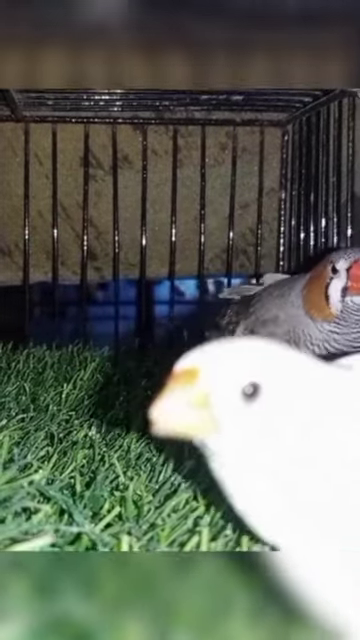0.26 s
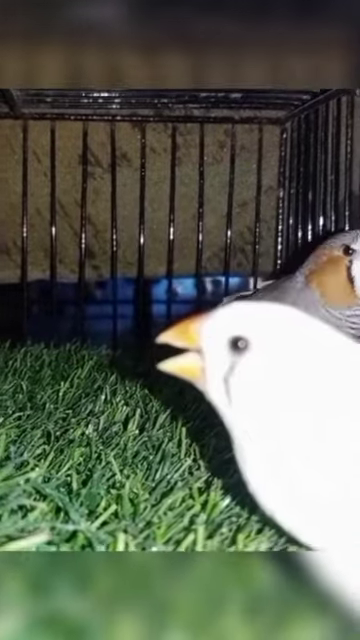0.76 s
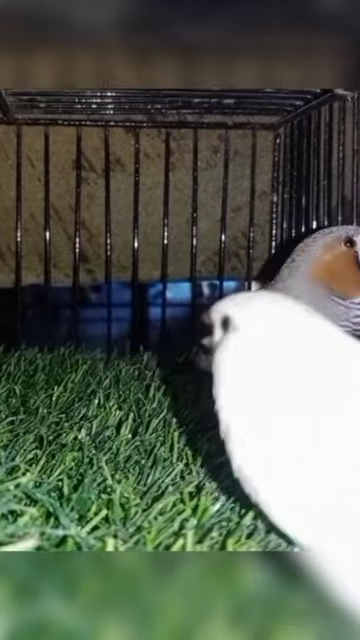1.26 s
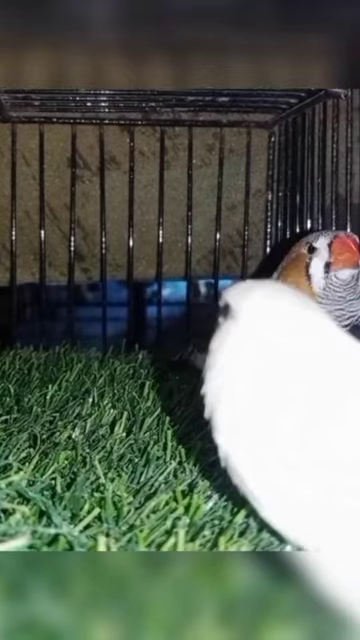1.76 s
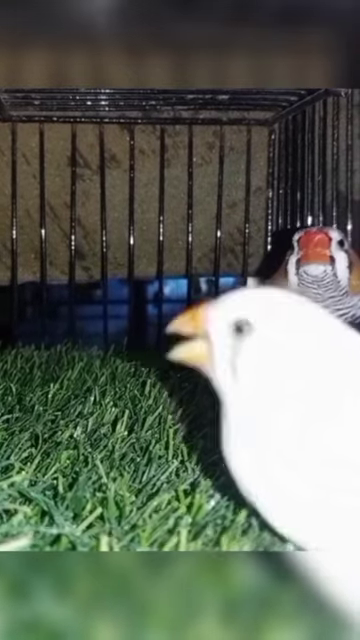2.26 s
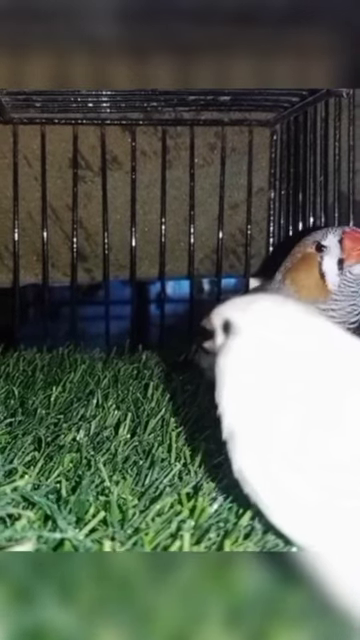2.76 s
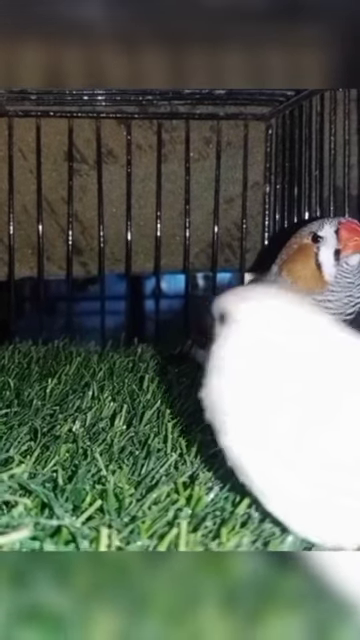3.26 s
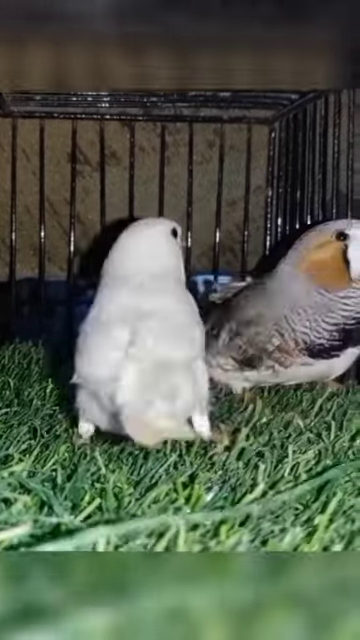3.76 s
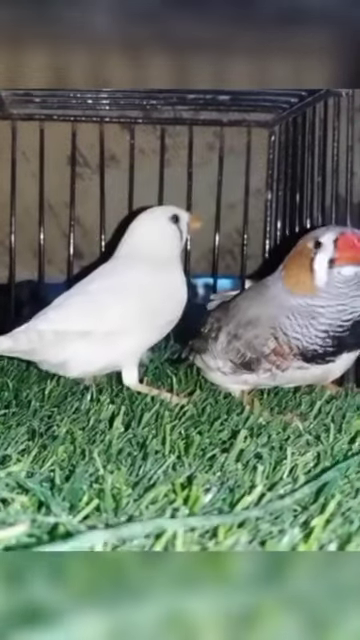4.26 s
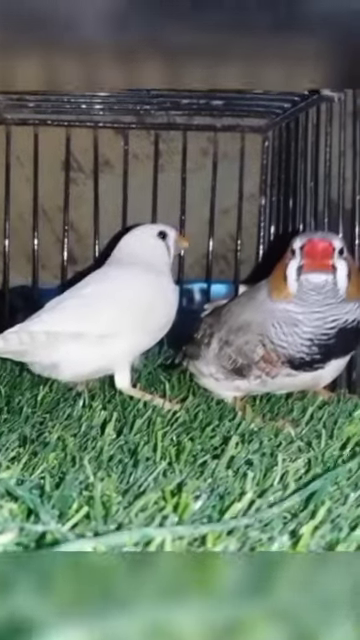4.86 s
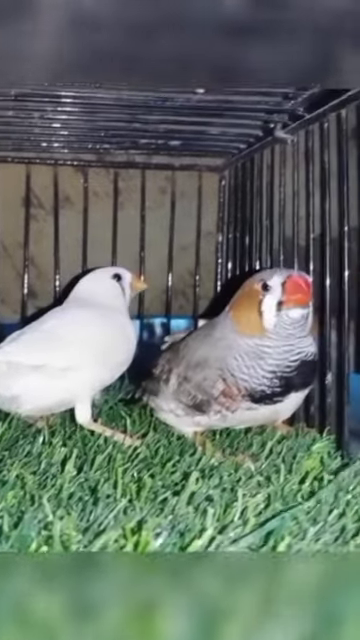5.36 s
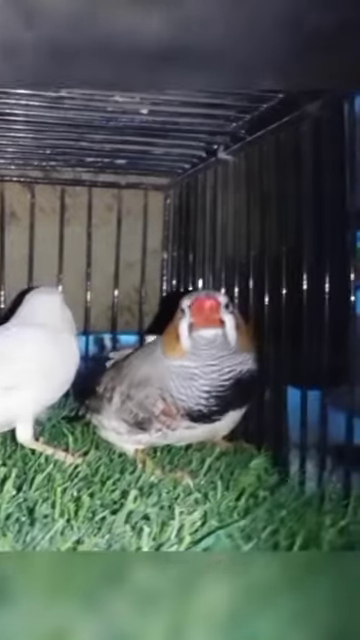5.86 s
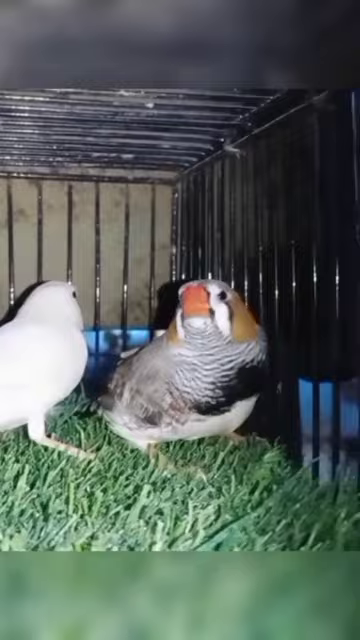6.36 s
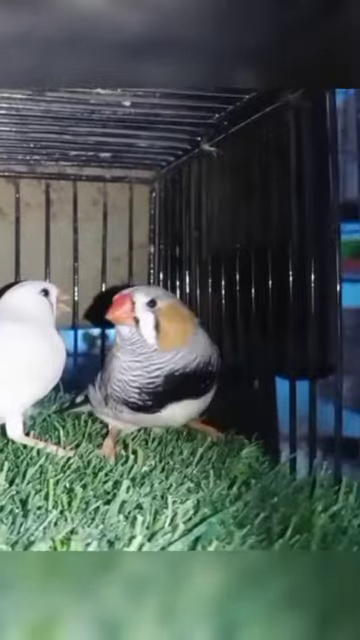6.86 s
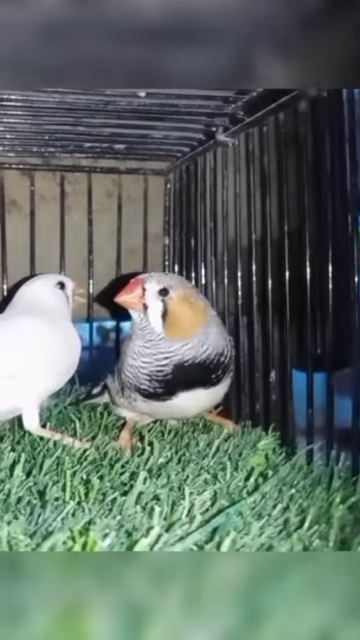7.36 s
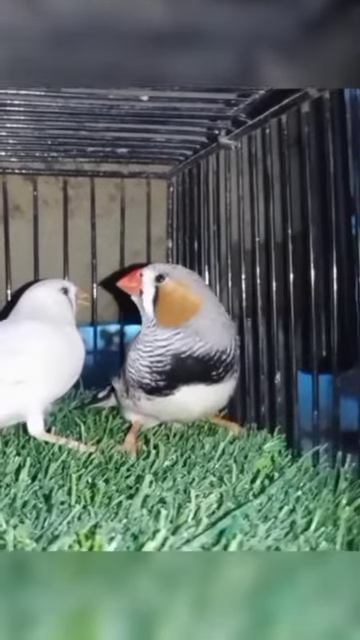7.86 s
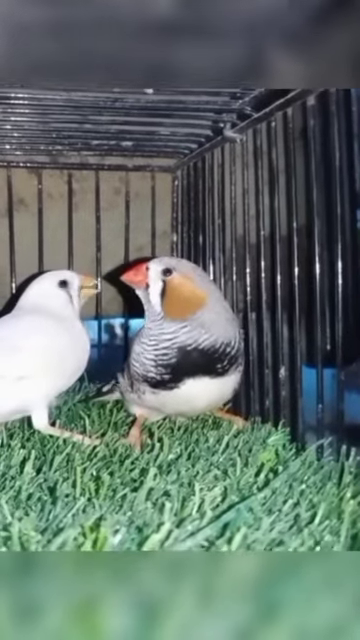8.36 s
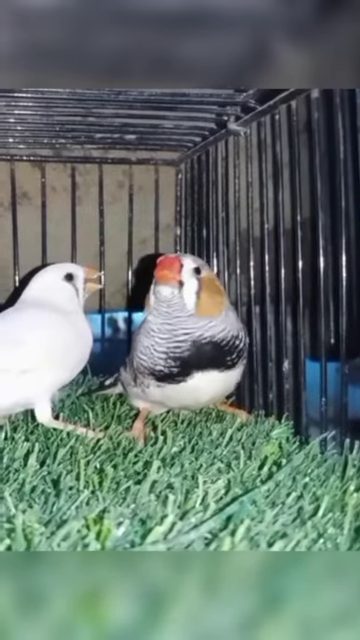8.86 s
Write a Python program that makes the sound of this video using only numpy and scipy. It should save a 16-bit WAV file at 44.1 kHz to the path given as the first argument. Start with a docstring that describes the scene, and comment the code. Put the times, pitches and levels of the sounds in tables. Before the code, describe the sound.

Small finches chirp almost continuously at close range, high sliding notes, peeps and a short fast trill, with faint low rumble behind.

```python
"""A phone close to small caged finches in a small room, for nine seconds: whistles, slurs and buzzes.
A far rumble, hum and hiss are there from the start; the rumble's ground-echo comb drifts mostly down as it fades.
Sliding notes come first, then scooped peeps from 1 s, rustles from 3 s, a rasping row at 4 s, a fast trill
at 5 s, one dull tap near 7 s and peeps at the end. Noise tails act as walls and wash out every slur.
The phone bends loud notes a little; its crude rate conversion shadows tones 3.9 kHz above and below."""
import sys
import numpy as np
from scipy import signal
from scipy.fft import rfft, irfft, next_fast_len
from scipy.io import wavfile
from scipy.ndimage import uniform_filter1d

SR = 44100
rng = np.random.default_rng(int(sys.argv[2]) if len(sys.argv) > 2 else 0)


def persist_wave(psi):
    """Save psi, clipped to +-1, as 16-bit WAV."""
    counts = np.round(np.clip(psi, -1, 1) * 32767).astype(np.int16)
    wavfile.write(sys.argv[1], SR, np.atleast_2d(counts).T)


N = 402191

# Far rumble and the delay of its reflection off the ground: start_s, level_db, echo_lag_ms
RUMBLE_PATH = [(0, -56, 3.6), (.6, -52, 3.67), (2.3, -52, 3.44), (2.999, -50.5, 3.73), (3.8, -52, 5.34),
               (4.5, -56.5, 5.2), (6.502, -58, 5.65), (9.12, -66, 6)]
# Spectrum shapes of the rumble, room hum, hiss and rustles: frequency_hz, relative_density_db
RUMBLE_COLOUR = [(30, -45.5), (130, -6), (220, -1), (350, -7), (900, -8), (1500, -18.5), (2400, -33.5)]
HUM_COLOUR = [(30, -45), (70, -14.5), (120, -4.5), (190, 2), (300, -6.5), (1200, -21.5), (2400, -34.5)]
HISS_COLOUR = [(1500, -3.5), (2500, -6), (4500, -9), (6000, -4.5), (8000, -17), (11000, -22)]
RUSTLE_COLOUR = [(1500, -30), (3000, -12), (5000, -1), (7000, -2), (9000, -4), (12000, -17)]
GROUND_SHARE = 0.36  # gain of the ground echo
HUM_DB, HISS_DB = -59, -63  # middle of each wandering level

# In the bird tables level_db is rms, direct sound and corner tail together;
# walls_db is the send to the walls against the direct path.
# Single slides: start_s, length_s, from_hz, to_hz, bend (higher = quicker start), level_db,
# attack_share, fade_db, buzz (0-1), walls_db
SLIDES = [(.212, 0.092, 3200, 3920, 1.21, -27.5, 0.4, 10, 0.5, -8),
          (0.068, 0.094, 3250, 2180, 1, -42.5, 0.29, 17, 0.077, 10),
          (.208, 0.29, 3060, 4574, 2.77, -29, 0.028, 13.4, 0.1, -1.5),
          (0.595, 0.07, 1890, 2405, 4.5, -38.5, 0.36, 14, 0.077, -4),
          (.592, 0.022, 2770, 4700, .1, -41.5, 0.47, 1.5, .05, -5),
          (.608, 0.018, 3180, 3710, .1, -42, .5, 3, 0.055, 5),
          (0.635, 0.15, 4650, 5700, 8, -34, 0.23, 3, 0.16, -0.5),
          (0.638, 0.08, 4510, 5190, 1.03, -34.5, 0.044, 5.6, 0.48, 1),
          (0.761, 0.018, 4020, 4800, 0.35, -41, 0.31, 3, 0.06, 4),
          (.69, 0.012, 4900, 3900, 0.91, -42, .3, 4, .06, 3),
          (0.975, 0.045, 4330, 5480, 6, -29, 0.3, 8.3, 0.21, -1),
          (2.622, 0.038, 4380, 4420, 3.3, -22.5, 0.39, 13, 0.2, -18),
          (5.384, 0.0099, 3080, 2670, 0.096, -48, 0.44, 2.5, .1, -2),
          (5.445, 0.026, 2020, 2330, 0.65, -47.5, 0.33, 5, .1, -10),
          (7.778, 0.075, 3990, 3273, 3.8, -30, 0.15, 21, 0.91, 15),
          (0.97, 0.054, 5400, 6100, 5.3, -17.5, 0.39, 13, 0.26, -7.5),
          (1.333, 0.042, 4000, 2980, 0.75, -40.5, .05, 14, 0.18, 8.5),
          (1.926, 0.064, 3430, 2775, 0.34, -42.5, 0.82, 1.6, 0.44, 18),
          (3.534, 0.036, 4620, 4456, 0.078, -17, 0.68, 7, 0.074, -6.5),
          (3.947, 0.03, 2450, 2754, 2.9, -34.5, 0.19, 18, 0.096, 10),
          (4.42, 0.023, 3940, 3000, 0.57, -39, .2, 11, 0.28, 3),
          (4.463, 0.05, 6305, 6458, 3.1, -17, 0.89, 30, 0.063, -5),
          (4.544, 0.044, 5300, 3260, 0.11, -44.5, 0.11, 8.1, 0.3, 23),
          (4.673, 0.079, 1900, 2490, 2, -40, 0.62, 7.4, 0.17, -1.5),
          (4.744, 0.15, 2470, 2805, 8.8, -39, 0.81, 8, 0.087, 0),
          (4.882, 0.091, 3230, 4100, 0.57, -43, 0.34, 1.3, 0.22, -6.5),
          (4.965, 0.12, 5290, 3075, 1.44, -19.5, 0.19, 13, 0.074, 4),
          (5.058, 0.13, 4286, 4700, 0.13, -39, 0.21, 23, 0.072, 4),
          (5.196, 0.07, 5400, 4610, 0.046, -35.5, 0.34, 3, 0.17, 3),
          (5.265, .07, 4500, 4300, 0.77, -38, 0.4, 3.9, 0.2, 7),
          (5.161, 0.016, 8500, 8010, .1, -24, .4, 6, .05, -13),
          (5.299, 0.015, 6800, 5320, 0.56, -28, 0.45, 3, .09, -5),
          (5.328, 0.026, 6720, 4160, 0.53, -24, 0.16, 14, .1, 7),
          (5.445, 0.15, 2900, 2690, 3.3, -41.5, 0.024, 7.2, 0.1, 5),
          (5.469, 0.1, 5480, 5400, 0.14, -46.5, 0.11, .7, 0.038, -25),
          (5.636, 0.06, 4700, 6025, 8.9, -24, 0.11, 4.8, 0.21, -3.5),
          (5.656, 0.045, 5900, 5290, 7.2, -22, 0.23, 40, 0.39, -6),
          (5.804, 0.036, 3510, 2694, 0.56, -42, 0.26, 4.9, 0.19, 6),
          (6.273, 0.051, 4970, 4150, 0.088, -41, 0.6, 0.92, 0.1, 15),
          (6.901, 0.061, 5710, 4320, 0.37, -38, 0.16, 3.9, 0.25, 8),
          (6.968, 0.02, 4315, 4440, 1, -23.5, 0.32, 4.1, 0.13, 1),
          (7.078, 0.057, 4747, 4924, .1, -21.5, 0.24, 5, 0.26, -2),
          (7.774, 0.077, 4110, 2580, 2.38, -25.5, 0.07, 18.5, 0.11, 6),
          (7.879, 0.028, 2700, 3880, .1, -44.5, 0.34, 2, .15, -2),
          (8.122, 0.032, 3010, 4070, 5.7, -22, 0.37, 7.5, 0.67, -2.5),
          (9.004, 0.045, 4636, 4464, .1, -22, 0.62, 8.5, 0.096, -3.5)]
RISE_POWER, FADE_POWER = 0.94, 1.6
# Short whistles that scoop up into pitch: start_s, length_s, pitch_hz (before sag), level_db,
# attack_share, walls_db
PEEPS = [(1.078, 0.056, 4000, -17, 0.42, -9), (1.183, 0.049, 3942, -14.5, 0.46, -13),
         (1.291, 0.036, 3970, -14.5, 0.7, -9), (3.478, 0.054, 3896, -15.5, 0.26, -6),
         (5.753, 0.047, 3914, -18.5, 0.48, -4), (5.855, 0.043, 3888, -19, 0.31, -2),
         (8.95, 0.045, 3918, -18, 0.35, -3.5)]
PEEP_BUZZ, PEEP_SCOOP, PEEP_BEND, PEEP_SAG = 0.045, 0.1, 12.7, 0.018  # scoop and sag: share of pitch
PEEP_FADE_DB, PEEP_FADE_POWER = 21.5, 2.2
# Buzzy rising notes in a row: start_s, length_s, pitch_hz (before climb), level_db, walls_db
RASPS = [(3.983, 0.045, 3542, -21.5, 0.5), (4.072, 0.051, 4400, -20.5, 0.5),
         (4.174, 0.048, 4390, -20.5, 0.5), (4.263, 0.052, 4383, -21, 3.5), (4.368, 0.051, 4328, -20, -0.5)]
RASP_BUZZ, RASP_SCOOP, RASP_BEND, RASP_CLIMB = 0.2, 0.121, 14, 0.041  # scoop and climb: share of pitch
RASP_ATTACK, RASP_FADE_DB = 0.37, 15
RASP_SECOND_HZ, RASP_SECOND_DB = 243, -8.5  # second side of the syrinx against the first
# Repeated syllables by name: buzz (0-1), then points of length_share, pitch_hz (before detune), relative_db
SYLLABLES = { "hook": (0.18, [(0, 5400, -14), (.23, 3640, -16), (.46, 2648, -6.5), (.55, 2606, -13),
             (.7, 3600, 0.5), (.85, 4660, -1), (1, 4750, -19)]), "flick": (0.073, [(0, 4700, -8.5),
             (.14, 3400, -10.5), (.29, 3550, -3), (.45, 5350, -4.5), (.62, 4200, 3), (.85, 3280, -1.5),
             (1, 2850, -6)]), "dip": (0.25, [(0, 5570, -7.5), (.09, 3980, -18.5), (.18, 3440, -10.5),
             (.27, 5594, -4.5), (.36, 5040, -0.5), (.5, 3840, 0.5), (.7, 3050, -5.5), (.8, 3000, -9),
             (1, 2630, -30)]), "croak": (0.35, [(0, 3546, -28), (.09, 3550, -16), (.14, 4410, -25.5),
             (.3, 3326, -4.5), (.47, 2720, -19), (.6, 3300, -2.5), (.7, 3883, 2), (1, 3954, -5.5)]),
             "droop": (0.065, [(0, 4303, -22.5), (.22, 4160, -0.5), (.44, 3720, -4.5), (.63, 3280, -10.5),
             (1, 3148, -10.5)]), "twirl": (0.066, [(0, 7200, -27.5), (.14, 7000, -12), (.25, 5967, 1),
             (.45, 6530, -3.5), (.59, 5980, -3.5), (.76, 4500, -1.5), (.88, 4170, -3), (1, 6060, -17)]),
             "settle": (0.13, [(0, 6350, -24.5), (.3, 5590, -9.5), (.6, 5370, 0.5), (.85, 5200, -7.5),
             (1, 5300, -40.5)]), "warble": (0.14, [(0, 6390, -23), (.04, 6260, -12.5), (.1, 4010, -7.5),
             (.15, 3330, -10), (.18, 4446, -18), (.22, 5500, -8), (.33, 6300, -8), (.42, 6600, -3),
             (.53, 5220, 1), (.68, 4244, -4), (.74, 5350, -7.5), (.8, 5700, 1), (.88, 4810, 2.5),
             (.95, 4260, -0.5), (1, 4390, -5.5)])}
# Where each syllable is sung: start_s, syllable, length_s, detune_percent, level_db, walls_db
SONG = [(0.532, "flick", 0.06, -7.5, -44.5, 2), (0.796, "flick", 0.071, 3.5, -35, 3),
        (0.924, "flick", 0.076, 3, -35.5, 3.5), (1.42, "hook", 0.063, -6.5, -27, 0),
        (1.535, "twirl", 0.086, 1.5, -20.5, 1), (1.621, "settle", 0.044, -0.4, -13, -3),
        (1.773, "dip", 0.094, -1.3, -21, -1.5), (1.956, "warble", 0.13, -0.8, -22, 0.5),
        (2.72, "croak", 0.077, -2, -20.5, -7.5), (2.841, "croak", 0.089, 1, -20, -6),
        (3.366, "hook", 0.054, 1.5, -26, -1.5), (5.451, "flick", 0.078, -1, -35, 11),
        (6.023, "hook", 0.055, -1, -27.5, 1), (6.14, "twirl", 0.075, 1, -17, 3),
        (6.218, "settle", 0.053, 0.1, -15, -2), (6.428, "dip", 0.098, -3.5, -22.5, 0.5),
        (6.623, "warble", 0.13, -1.4, -22.5, 0.5), (7.222, "droop", 0.073, 0.5, -18.5, -1.5),
        (7.335, "droop", 0.073, 0, -19, -4), (7.454, "droop", 0.069, 0, -18.5, 1),
        (8.835, "hook", 0.049, 1.5, -27, -0.5)]
# Second side of the syrinx, by syllable: offset_hz, relative_db
SECOND_SIDE = {"croak": (280, -2.5), "droop": (120, -6.5), "hook": (280, -6.5)}
# Phrases sung once: buzz (0-1), walls_db, points of start_s, pitch_hz, level_db;
# some long falls add a trailing copy that beats with the note: lag_s, relative_db
PHRASES = [(0.028, -6.5, [(.665, 2530, -57), (.7, 2790, -53.5), (.79, 2833, -43.5), (.82, 2813, -32),
           (.88, 2900, -28.5), (.915, 2860, -33), (.935, 2950, -56)]), (0.11, -6.5, [(6.94, 8000, -36.5),
           (6.948, 6100, -35.5), (6.962, 6000, -26), (6.972, 4310, -29)]), (0.13, -2.8, [(.212, 3455, -35),
           (.25, 4030, -21.5), (.27, 4140, -17.5), (.3, 4390, -30), (.35, 4635, -28.5), (.42, 4820, -32),
           (.462, 4830, -33)]), (0.096, -4.5, [(2.152, 8660, -46), (2.163, 8450, -33), (2.17, 7640, -31),
           (2.191, 6600, -20.5), (2.228, 5070, -20.5), (2.257, 4405, -21.5), (2.302, 3690, -25),
           (2.321, 3500, -20), (2.354, 3265, -28), (2.396, 3160, -26), (2.42, 3064, -29.5),
           (2.437, 3260, -50)], (.0065, -5.5)), (0.2, -5.5, [(.106, 4870, -54), (.115, 5310, -20.5),
           (.126, 5145, -15), (.144, 4280, -20), (.162, 4330, -38)]), (.05, 1, [(.706, 5700, -30),
           (.716, 5360, -34.5), (.724, 4570, -31.5), (.733, 3550, -44), (.744, 3400, -35),
           (.758, 4820, -40.5)]), (0.2, 0.5, [(2.536, 7500, -43), (2.542, 4920, -34.5),
           (2.552, 6600, -33.5), (2.559, 7450, -22.5), (2.566, 7290, -42), (2.58, 6210, -27),
           (2.594, 6000, -27), (2.603, 4390, -19.5), (2.614, 3514, -21.5), (2.625, 4490, -18.5),
           (2.642, 5350, -26.5), (2.662, 5400, -44)]), (.2, 5, [(4.562, 4750, -43.5), (4.568, 6370, -44),
           (4.577, 5670, -46), (4.585, 6900, -47), (4.596, 7360, -48), (4.618, 6430, -55)]),
           (0.021, -11.5, [(3.719, 7480, -48.5), (3.743, 7240, -21), (3.77, 7055, -14.5),
           (3.812, 7480, -15), (3.83, 7303, -19), (3.863, 7250, -15.5), (3.89, 7260, -32.5)]),
           (0.32, -3, [(4.718, 4800, -54), (4.738, 4820, -31), (4.755, 4960, -26.5), (4.764, 5150, -45),
           (4.782, 5050, -37), (4.798, 4830, -45)]), (0.052, -2, [(4.728, 5260, -42), (4.752, 5430, -27.5),
           (4.765, 5520, -32), (4.773, 5605, -31.5), (4.82, 5675, -25.5), (4.862, 5675, -22),
           (4.903, 5670, -38)]), (0.081, 8, [(6.256, 6410, -32), (6.275, 5860, -45), (6.295, 4550, -53),
           (6.325, 4180, -45)]), (0.16, 1, [(5.203, 3414, -45), (5.209, 3220, -42), (5.217, 3910, -50),
           (5.222, 2660, -51), (5.235, 3750, -33.5), (5.248, 2660, -42.5), (5.265, 4160, -36)]),
           (.06, -2, [(5.358, 5900, -41), (5.377, 5280, -26.5), (5.385, 4900, -34), (5.398, 3300, -41),
           (5.412, 4240, -39), (5.422, 3350, -37.5)]), (0.029, -6, [(6.816, 3280, -43), (6.826, 2780, -33),
           (6.832, 2780, -28.5), (6.84, 3720, -25.5), (6.847, 5300, -49), (6.857, 3720, -28),
           (6.87, 3135, -21.5), (6.884, 3120, -40)]), (0.17, -0.85, [(6.984, 5100, -30),
           (6.992, 6400, -25.5), (7.008, 6950, -29.5), (7.017, 6900, -24), (7.025, 6400, -18),
           (7.034, 5400, -16.5), (7.05, 4250, -23), (7.068, 3305, -32.5), (7.085, 4000, -26.5),
           (7.098, 4450, -25.5)]), (0.09, 0, [(7.604, 7700, -29), (7.612, 4520, -32.5), (7.62, 6500, -22.5),
           (7.63, 6674, -18.5), (7.648, 6530, -25), (7.66, 5200, -17.5), (7.667, 4700, -20),
           (7.674, 5200, -28.5), (7.682, 6340, -19.5), (7.697, 6690, -20), (7.708, 6670, -31)]),
           (0.056, -3.1, [(7.92, 6160, -48), (7.945, 5910, -26.5), (7.953, 5580, -24), (7.959, 5430, -21),
           (7.964, 5150, -13.5), (7.996, 4480, -22), (8.02, 4210, -13.5), (8.03, 4203, -17),
           (8.04, 4300, -39)], (.006, -12.5)), (0.12, 3.4, [(7.98, 6600, -40.5), (7.995, 6280, -34.5),
           (8.008, 5800, -40), (8.022, 6010, -39), (8.033, 4700, -35.5), (8.046, 5200, -35),
           (8.058, 6200, -38), (8.072, 5340, -32), (8.084, 4700, -45), (8.105, 5540, -34)]),
           (0.092, 7.4, [(8.16, 6320, -41), (8.175, 5400, -45), (8.187, 4000, -47), (8.205, 5780, -38.5),
           (8.222, 5790, -42), (8.24, 5800, -36.5), (8.27, 4330, -34.5), (8.298, 3160, -48),
           (8.318, 4200, -33.5), (8.34, 5020, -49), (8.352, 4510, -41.5), (8.365, 4860, -53),
           (8.39, 3800, -55.5)])]
# Centre line of the fast trill: start_s, pitch_hz, level_db
TRILL = [(5.174, 7700, -34), (5.184, 7220, -24), (5.2, 6950, -23), (5.23, 6750, -27.5),
         (5.245, 6540, -32.5), (5.29, 6320, -30), (5.315, 6580, -26), (5.336, 6800, -30)]
TRILL_HZ, TRILL_SWING, TRILL_THROB_DB = 175, 0.095, 1  # swings per second, share of pitch, dB
TRILL_BUZZ, TRILL_WALLS_DB = 0.2, 0
# Weak overtones of each whistle: multiple, level_db at 4 kHz, slope_db_per_octave of pitch
OVERTONES = [(2, -27, 9), (3, -40, -20.5)]
BUZZ_BAND_HZ, BUZZ_DEPTH, OVERTONE_BLUR = (80, 530), 0.93, 3
EDGE_S = 0.004  # fade outside each end of a note

FIRST_ECHO_S, FIRST_ECHO_DB = 0.006, -12.5
NEAR_T60_S, NEAR_DB, NEAR_POWER = 0.088, -2, 3  # cage corner
ROOM_T60_S, ROOM_DB, ROOM_GROWTH = 0.46, -17, 1.44  # growth: dB of room send per dB of corner send
ECHO_RISE_S = 0.005

# Feathers or feet: start_s, length_s, level_db (top of the swell)
RUSTLES = [(3.096, 0.013, -56), (3.186, 0.0052, -64), (3.262, 0.04, -59), (4.525, 0.11, -49.5)]
RUSTLE_GRAIN_DB = 1.1
# Taps on the cage: start_s, level_db (start of the decay), pitch_hz
KNOCKS = [(6.895, -38, 905)]
KNOCK_T60_S = 0.068

CAPTURE_RATE = 48000  # Hz
DULL_HZ, TOP_HZ = 10980, 15650


def undb(db):
    """Turn decibels into gain."""
    return 10 ** (np.asarray(db) / 20)


def noise(colour):
    """Noise of rms 1, shaped in frequency by a colour table."""
    size = next_fast_len(N)
    hz, db = np.transpose(colour)
    bins = np.maximum(np.arange(size // 2 + 1) * SR / size, 1)
    gain = undb(np.interp(np.log(bins), np.log(hz), db))
    x = irfft(rfft(rng.standard_normal(size)) * gain, size)
    return (x / x.std())[:N]


def walk(rate):
    """Random levels held 1 / rate seconds and smoothed twice; spread near 1.5."""
    hold = int(SR / rate)
    steps = np.repeat(rng.standard_normal(N // hold + 1), hold)
    return 2.0 * uniform_filter1d(uniform_filter1d(steps, hold), hold)[:N]


def rumble():
    """Far low noise plus its ground echo: the lag sets a comb that drifts as the source moves."""
    s, db, lag_ms = np.transpose(RUMBLE_PATH)
    at = np.arange(N)
    direct = noise(RUMBLE_COLOUR)
    lag = np.interp(at / SR, s, lag_ms) * SR / 1000
    x = direct + GROUND_SHARE * np.interp(at - lag, at, direct)
    return x / x.std() * undb(np.interp(at / SR, s, db) + 0.83 * walk(5.013))


def room_hum():
    """The room's low hum: low-weighted noise whose level wanders slowly."""
    return undb(HUM_DB + 0.48 * walk(2.9)) * noise(HUM_COLOUR)


def hiss():
    """Faint hiss: brighter noise whose level wanders faster."""
    return undb(HISS_DB + 3.3 * walk(8.1)) * noise(HISS_COLOUR)


def slide(start, length, from_hz, to_hz, bend, db, attack, fade_db, buzz, walls_db,
          sag=0, power=FADE_POWER):
    """One note: pitch eases from one value to another, level swells to its peak and fades."""
    u = np.linspace(0, 1, num=60)
    eased = (1 - np.exp(-bend * u)) / (1 - np.exp(-bend))
    hz = (from_hz + (to_hz - from_hz) * eased) * (1 - sag * u)
    rise_db = 20 * RISE_POWER * np.log10(np.sin(np.pi / 2 * np.clip(u / attack, .02, 1)))
    faded = np.clip((u - attack) / (1 - attack), 0, 1) ** power
    return buzz, walls_db, start + length * u, hz, db + rise_db - fade_db * faded


def peeps():
    """Near-level whistles that scoop up into pitch and sag slightly."""
    return [slide(s, length, hz * (1 - PEEP_SCOOP), hz, PEEP_BEND, db, attack, PEEP_FADE_DB,
                  PEEP_BUZZ, walls_db, PEEP_SAG, PEEP_FADE_POWER)
            for s, length, hz, db, attack, walls_db in PEEPS]


def rasps():
    """Rising notes; the second side of the syrinx sings higher and beats with the first."""
    out = []
    for s, length, hz, db, walls_db in RASPS:
        for up_hz, down_db in ((0, 0), (RASP_SECOND_HZ, RASP_SECOND_DB)):
            out.append(slide(s, length, hz * (1 - RASP_SCOOP) + up_hz, hz + up_hz, RASP_BEND,
                             db + down_db, RASP_ATTACK, RASP_FADE_DB, RASP_BUZZ, walls_db, -RASP_CLIMB))
    return out


def song():
    """Repeated syllables, stretched and detuned; some sound both sides of the syrinx."""
    out = []
    for s, name, length, detune, db, walls_db in SONG:
        buzz, shape = SYLLABLES[name]
        share, hz, relative_db = np.transpose(shape)
        times = s + length * share
        hz = hz * (1 + detune / 100)
        out.append((buzz, walls_db, times, hz, db + relative_db))
        if name in SECOND_SIDE:
            up_hz, down_db = SECOND_SIDE[name]
            out.append((buzz, walls_db, times, hz + up_hz, db + relative_db + down_db))
    return out


def phrases():
    """Pitch and level contours sung once, some with a trailing copy that beats with them."""
    out = []
    for buzz, walls_db, rows, *trails in PHRASES:
        s, hz, db = np.transpose(rows)
        for lag, offset_db in [(0.00018, 0.0025)] + trails:
            out.append((buzz, walls_db, s + lag, hz, db + offset_db))
    return out


def trill():
    """Fast pitch swings about a centre line, louder at the top of each swing."""
    s, hz, db = np.transpose(TRILL)
    t = np.linspace(s[0], s[-1], num=800)
    swing = np.sin(2 * np.pi * TRILL_HZ * (t - s[0]))
    swung_hz = np.interp(t, s, hz) * (1 + TRILL_SWING * swing)
    return [(TRILL_BUZZ, TRILL_WALLS_DB, t, swung_hz, np.interp(t, s, db) + TRILL_THROB_DB * swing)]


def notes():
    """Every note as (buzz, walls_db, times, pitch, level)."""
    return [slide(*row) for row in SLIDES] + phrases() + song() + peeps() + rasps() + trill()


def flutter():
    """Irregular wobble of the membranes in size and phase: complex band noise, rms 1."""
    band = signal.butter(2, BUZZ_BAND_HZ, "bandpass", fs=SR, output="sos")
    x = signal.sosfilt(band, signal.sosfilt(band, rng.standard_normal((2, N))))
    return (x[0] + 1j * x[1]) / np.sqrt(np.mean(x ** 2) * 2)


def finches():
    """Near-sine whistles with weak overtones: direct sound, and sends to cage corner and room."""
    direct, sent, wobble = np.zeros(N), np.zeros((2, N)), flutter()
    for buzz, walls_db, s, hz, db in notes():
        at = np.arange(max(int((s[0] - EDGE_S) * SR), 0), min(int((s[-1] + EDGE_S) * SR), N))
        t = at / SR
        fade = np.clip(np.minimum(t - t[0], t[-1] - t) / EDGE_S, 0, 1) ** 2
        pitch = uniform_filter1d(np.interp(t, s, hz), size=110)  # corners rounded over 2.5 ms
        turn = np.exp(2j * np.pi * np.cumsum(pitch) / SR)
        share = np.clip(BUZZ_DEPTH * buzz, 0, 1)
        tone = (turn * (np.sqrt(1 - share ** 2) + share * wobble[at])).imag
        # the flutter blurs the overtones more than the fundamental
        blur_share = np.clip(OVERTONE_BLUR * share, 0, 1)
        blur = np.sqrt(1 - blur_share ** 2) + blur_share * wobble[at[::-1]]
        for multiple, over_db, slope_db in OVERTONES:
            gain = undb(over_db + slope_db * np.log2(pitch / 4000))
            audible = multiple * pitch < .45 * SR  # stay clear of aliasing
            tone = tone + gain * (blur * turn ** int(multiple)).imag * audible
        tone = tone * np.sqrt(2) * undb(np.interp(t, s, db)) * fade
        # a bird that faces away is heard more by way of the walls
        tone = tone / np.sqrt(1 + undb(walls_db + NEAR_DB) ** 2)
        direct[at] += tone
        sent[:, at] += tone * undb([[walls_db], [walls_db * ROOM_GROWTH]])
    return direct, sent


def echo_tail(x, t60, db, power):
    """Scattered reflections: decaying noise of unit energy, convolved with the sound."""
    t = np.arange(int(SR / 2)) / SR
    rise = np.clip(t / ECHO_RISE_S, 0, 1)
    tail = rng.standard_normal(len(t)) ** power * undb(-60 * t / t60) * rise
    return signal.fftconvolve(x, undb(db) * tail / np.sqrt(np.sum(tail ** 2)))[:N]


def walls(sent):
    """One distinct echo and quick scattered ones from the cage corner, then the room's longer tail."""
    corner, room = sent
    # cubed noise: a few echoes stand out of the early wash
    out = echo_tail(corner, NEAR_T60_S, NEAR_DB, NEAR_POWER) + echo_tail(room, ROOM_T60_S, ROOM_DB, 1)
    lag = int(FIRST_ECHO_S * SR)
    return out + undb(FIRST_ECHO_DB) * np.concatenate([np.zeros(lag), corner[:-lag]])


def rustles():
    """Feathers or feet: soft grainy swells of bright noise."""
    t = np.arange(N) / SR
    swell = sum(undb(db) * np.sin(np.pi * np.clip((t - s) / length, 0, 1)) ** 2
                for s, length, db in RUSTLES)
    return swell * undb(RUSTLE_GRAIN_DB * walk(270)) * noise(RUSTLE_COLOUR)


def knocks():
    """A foot or beak taps the cage: a short dull ring, a decaying sine."""
    out = np.zeros(N)
    for s, db, hz in KNOCKS:
        t = np.maximum(np.arange(N) / SR - s, 0)
        out += undb(db - 60 * t / KNOCK_T60_S) * np.sin(2 * np.pi * hz * t)
    return out


def scene():
    """All that reaches the microphone: background, birds and walls, rustles and a tap."""
    background = rumble() + room_hum() + hiss()
    direct, sent = finches()
    return (background + direct + walls(sent) + rustles() + knocks())[None]


def record(dry):
    """The phone: lopsided capsule, dull top, straight-line rate conversion, steep cut."""
    x = dry[0] + 0.018 * dry[0] ** 2
    x = signal.sosfilt(signal.butter(1, 30, "highpass", fs=SR, output="sos"), x)
    x = signal.sosfilt(signal.ellip(8, .2, 45, DULL_HZ, fs=SR, output="sos"), x)
    captured = signal.resample_poly(x, 160, 147)  # up to the capture rate
    # straight lines between captured samples leave the shadow tones
    x = np.interp(np.arange(N) * CAPTURE_RATE / SR, np.arange(len(captured)), captured)
    return signal.sosfilt(signal.ellip(10, .2, 70, TOP_HZ, fs=SR, output="sos"), x)[None]


dry = scene()
out = record(dry)
persist_wave(out)
```